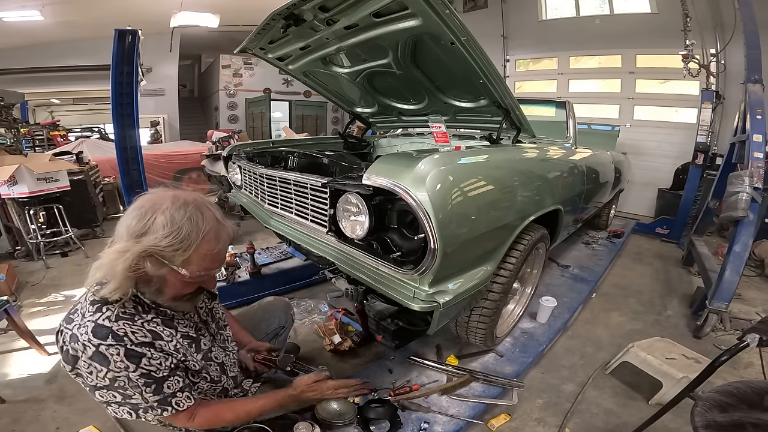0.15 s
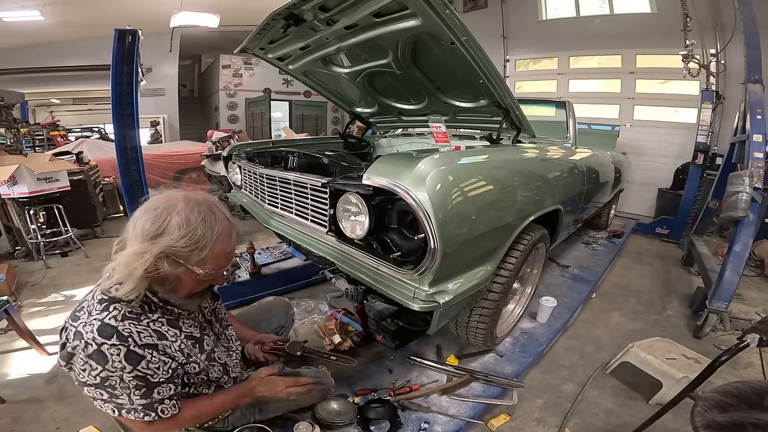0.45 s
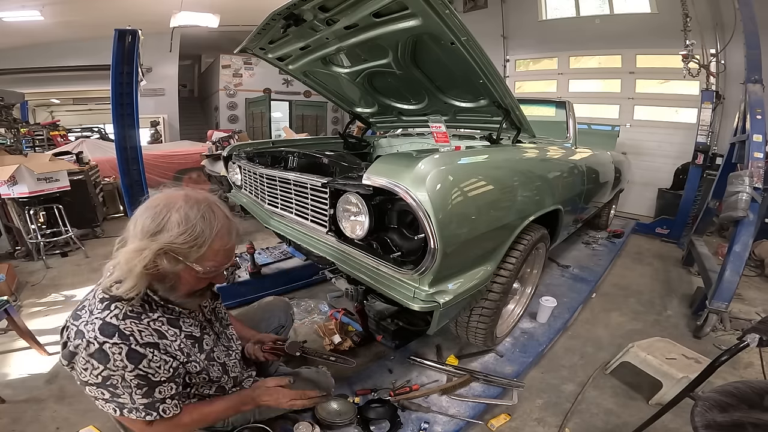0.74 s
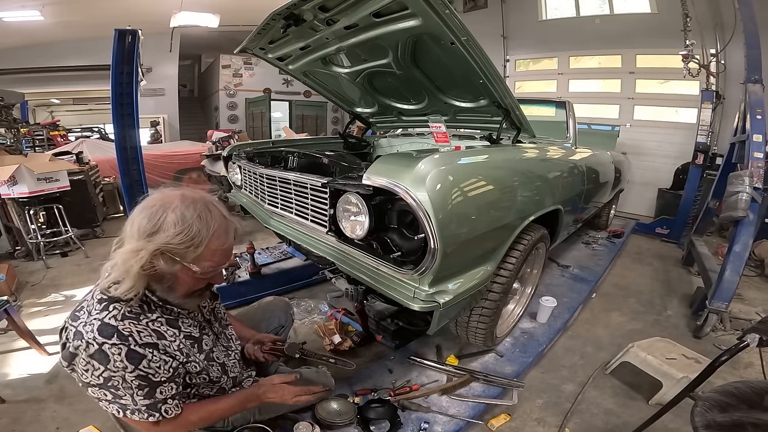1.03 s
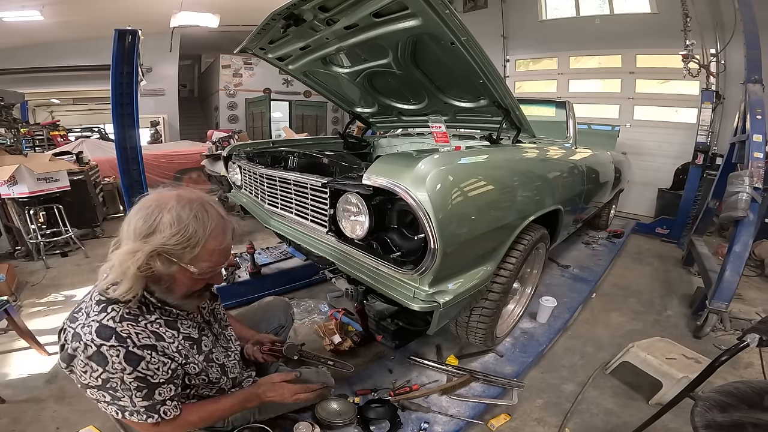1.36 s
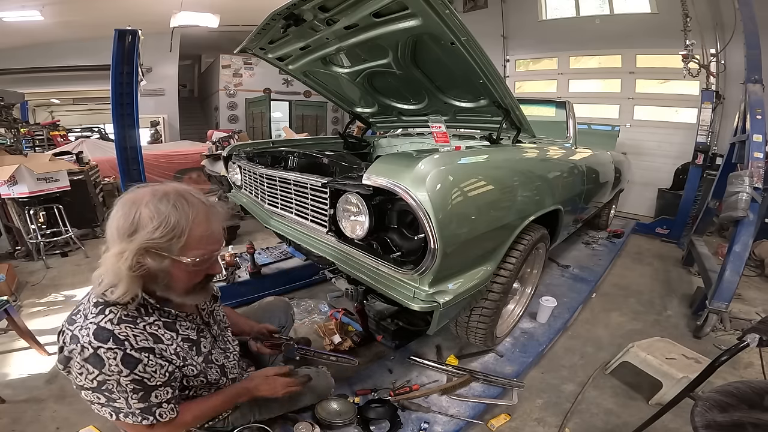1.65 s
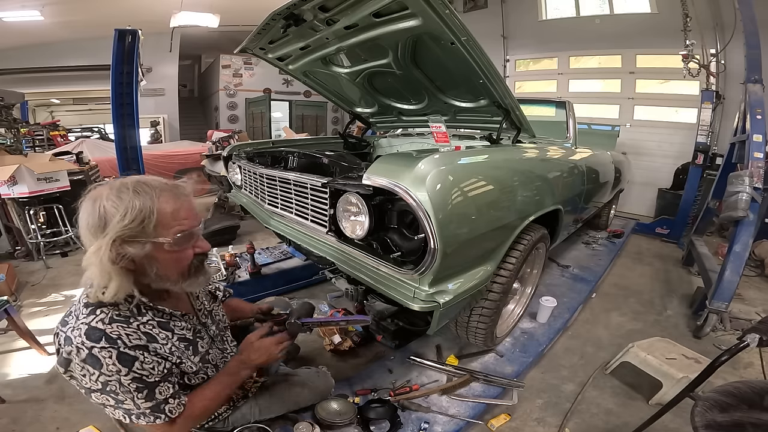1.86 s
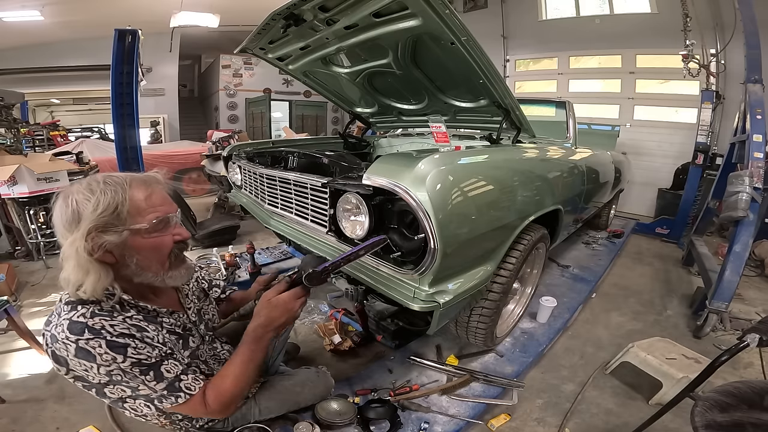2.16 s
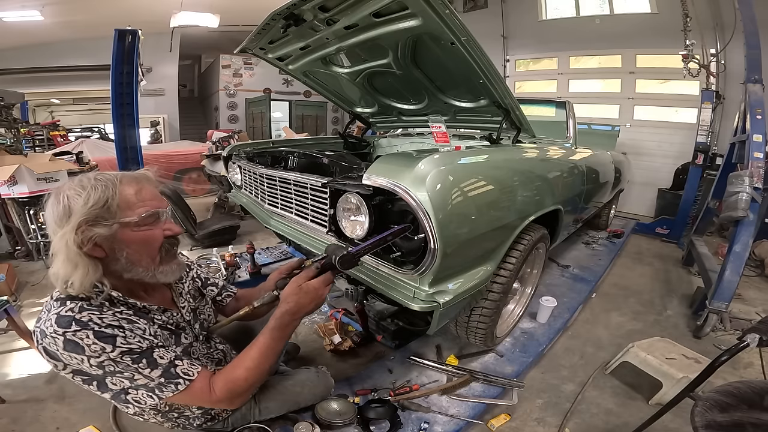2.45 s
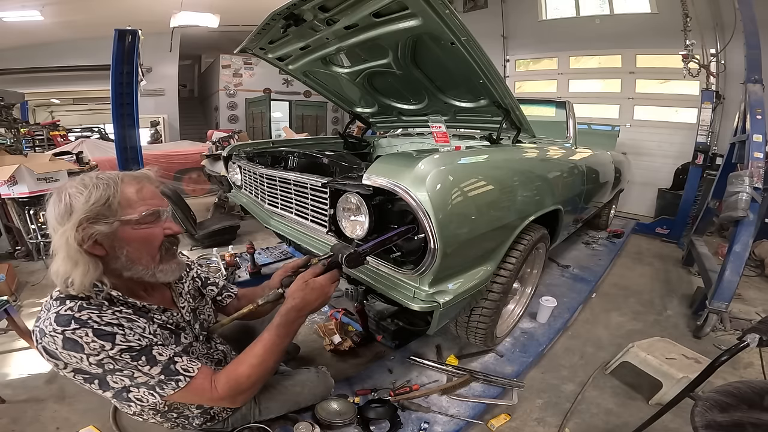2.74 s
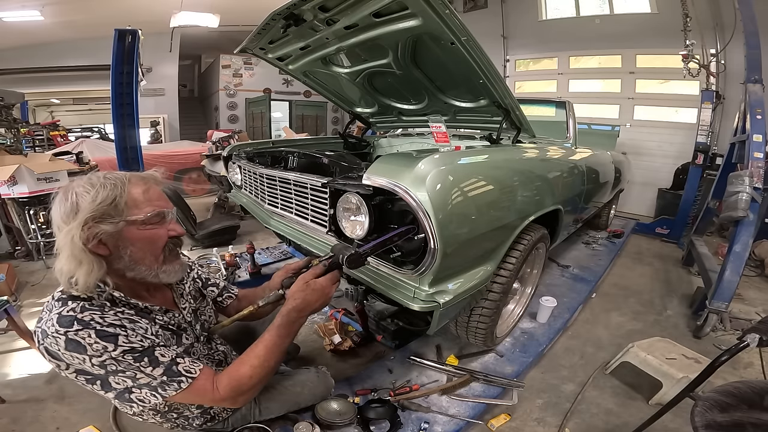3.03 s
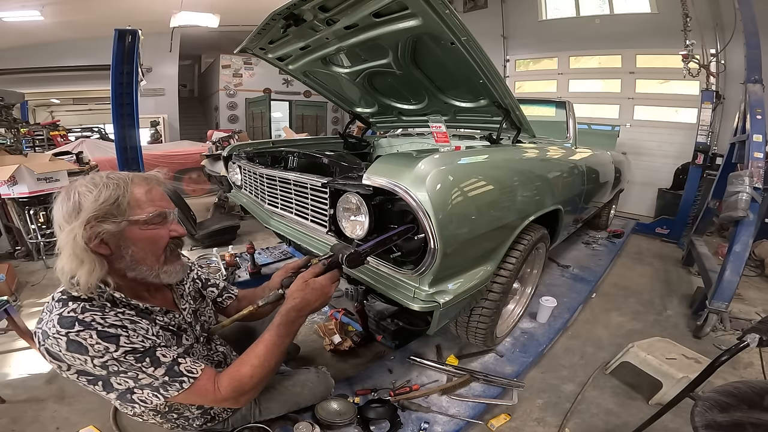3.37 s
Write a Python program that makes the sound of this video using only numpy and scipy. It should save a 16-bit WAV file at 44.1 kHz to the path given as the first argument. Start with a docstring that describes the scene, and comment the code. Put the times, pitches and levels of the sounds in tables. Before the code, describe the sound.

An air-driven rotary tool is blipped four times with snappy whines and hisses, pauses while a hollow part is knocked, then blips twice more and touches metal with a screech; close microphone in an echoing garage.

```python
"""An air-driven rotary tool is blipped in a large workshop: the trigger valve snaps open, air hisses and the vane
motor whines up and runs down. The vanes make a pulse train that rings the exhaust; the air is coloured noise.
The hall rings on as decaying noise. Between bursts a hollow part is knocked and scuffed by uneven noise grains;
at the end the bit taps metal (short sine modes) and screeches on it (noise through narrow resonances).
Mains hum, room noise, a faint air hiss and the dying tail of an earlier blast lie beneath."""
import sys
import numpy as np
from scipy import signal
from scipy.fft import rfft, irfft, next_fast_len
from scipy.io import wavfile
from scipy.ndimage import uniform_filter1d

SR = 44100
rng = np.random.default_rng(int(sys.argv[2]) if len(sys.argv) > 2 else 0)


def ratio_of_db(decibels):
    """Turn decibels (scalar or array-like) into linear amplitude factors; 0 dB maps to 1."""
    return 10 ** (np.asarray(decibels, float) / 20)


def wrap_up_sound(samples):
    """Save the sound to the file named by the first command line argument, as 16-bit audio."""
    columns = np.atleast_2d(samples).T
    # keep every value between -1 and 1, then stretch to whole-number steps
    tamed = np.clip(columns, -1, 1)
    steps = np.round(tamed * 32767).astype(np.int16)
    wavfile.write(sys.argv[1], SR, steps)


N = 154350
TIME = np.arange(N) / SR  # s
PATCHY_DB = 2.2  # usual unevenness of noise over time and frequency, dB rms


def unit(x):
    """Scaled to rms 1."""
    return x / np.sqrt(np.mean(x ** 2) + 1e-20)


def along(points, hz):
    """(Hz, value) points read on a log frequency axis."""
    f, v = np.transpose(points)
    return np.interp(np.log(hz + 1), np.log(f + 1), v)


def filtered(x, response):
    """x times a complex response of frequency."""
    size = next_fast_len(N + SR // 2)
    hz = np.fft.rfftfreq(size, 1 / SR)
    return irfft(rfft(x, size) * response(hz), size)[..., :N]


def noise(tone, patchy_db=PATCHY_DB):
    """Coloured noise of rms 1 with patches of random gain."""
    z = signal.stft(rng.standard_normal(N + 512), nperseg=512)[2]
    field = uniform_filter1d(rng.standard_normal(z.shape), 4, 0)
    field = uniform_filter1d(field, 8, 1)
    x = signal.istft(z * ratio_of_db(patchy_db * unit(field)), nperseg=512)[1][:N]
    return unit(filtered(x, lambda hz: ratio_of_db(along(tone, hz))))


def column(tables, index):
    """One column of several tables, interpolated along time."""
    rows = np.concatenate([np.array(r, float) for r in tables])
    return np.interp(TIME, rows[:, 0], rows[:, index])


def gain(tables, index=1):
    """Level column as gain, silent between the tables."""
    edge_s = 0.003
    on = sum(np.clip(np.minimum(TIME - r[0][0], r[-1][0] - TIME) / edge_s + .5, 0, 1) for r in tables)
    return np.minimum(on, 1) * ratio_of_db(column(tables, index))


def bursts_at(rows, t60):
    """An envelope that rises fast at each (s, dB) and dies away by 60 dB in t60 seconds."""
    rise_s = 0.0007
    total = np.zeros(N)
    for start, db in rows:
        age = np.abs(TIME - start)
        total += (TIME >= start) * ratio_of_db(db - 60 * age / t60) * (1 - np.exp(-age / rise_s))
    return total


def struck_mode(start, hz, db, t60):
    """One resonant mode rings as a decaying sine."""
    return bursts_at([(start, db)], t60) * np.sin(2 * np.pi * hz * (TIME - start))


def resonances(peaks, f):
    """The causal response of (Hz, width Hz, dB) resonances, summed with alternating sign."""
    total = 0
    for k, (centre, width, db) in enumerate(peaks):
        total = total + (-1) ** k * ratio_of_db(db) * 1j * f * width / (centre * centre - f * f + 1j * f * width)
    return total


def room_noise():
    """The empty room's steady, slightly patchy noise."""
    # Each row: frequency in Hz, spectrum in dB per Hz.
    floor_tone = [(18, -76), (40, -9), (109, 2.5), (160, -12.5), (186, -8), (328, -18.5), (2990, -23),
                  (7950, -49.5), (11400, -47.5), (14000, -53)]
    return ratio_of_db(-55.5) * noise(floor_tone)


def mains_hum():
    """Mains hum as steady sine tones."""
    # Each row: frequency in Hz, sine amplitude in dB.
    hum_tones = [(120, -64)]
    return sum(ratio_of_db(db) * np.sin(2 * np.pi * hz * TIME) for hz, db in hum_tones)


def air_leak():
    """A faint air hiss that sets in: coloured noise under a slow level curve."""
    # Level of the hiss. Each row: time in seconds, level in dB.
    leak_level = [(1.9, -75.5), (2.1, -66), (2.25, -57), (2.55, -60), (3.5, -60)]
    # Its colour. Each row: frequency in Hz, spectrum in dB per Hz.
    leak_tone = [(90, -33), (150, 0), (400, -11.5), (1360, -24), (2850, -25), (3060, -13), (3300, -27),
                 (3550, -27), (3720, -16.5), (3950, -22.5), (12300, -52), (14000, -66)]
    return gain([leak_level]) * noise(leak_tone)


def fading_blast():
    """An earlier blast of air dies in the hall, with one faint late puff, as fading noise."""
    # Level of the tail. Each row: time in seconds, level in dB.
    fading_level = [(0.0, -40.5), (0.27, -54), (.31, -48.5), (.36, -58), (0.5, -73)]
    # Its colour. Each row: frequency in Hz, spectrum in dB per Hz.
    fading_tone = [(88, -46), (150, -18), (280, 5.5), (467, -12), (532, -3), (2620, -1), (4220, -3),
                   (12000, -40), (15600, -90)]
    return gain([fading_level]) * noise(fading_tone)


def knocks():
    """Uneven soft contact drives the hollow part's resonances, with a scrape on top."""
    # One table a touch. Each row: time in seconds, ring level in dB, scrape over the ring in dB.
    touches = [
        [(2.585, -50.5, 2), (2.61, -46.5, -5.5), (2.685, -45, -40)],
        [(2.689, -34, -19), (2.72, -25.5, -28), (2.965, -46.5, -19.5)],
    ]
    # Resonances of the hollow part. Each row: centre in Hz, width in Hz, gain in dB.
    hollow = [(95, 30, -9), (174, 8.3, -1), (222.7, 7.7, 3.5), (302, 27, -9), (358, 24, -7), (431, 16, -12),
              (506, 32, -14), (580, 48, -16), (745, 180, -21.5)]
    # Colour of the scrape. Each row: frequency in Hz, spectrum in dB per Hz.
    scrape_tone = [(290, -42), (500, -12), (1760, -6), (2720, -16.5), (3030, -9), (7510, -34.5),
                   (9000, -59), (11700, -95)]
    roughness = unit(uniform_filter1d(rng.standard_normal(N), 300))
    grains = rng.standard_normal(N) * ratio_of_db(3.8 * roughness)
    ring = unit(filtered(grains, lambda f: resonances(hollow, f) / (1 + (f / 900) ** 2)))
    scrape = ratio_of_db(column(touches, index=2)) * noise(scrape_tone)
    return gain(touches) * (ring + scrape)


def clack():
    """One tap of the bit on metal rings a few short modes."""
    # Modes of the tapped metal. Each row: frequency in Hz, level in dB, t60 in seconds.
    clack_modes = [(1620, -21, .08), (2330, -23, .06), (2760, -27, .06)]
    return sum(struck_mode(3.362, hz, db, t60) for hz, db, t60 in clack_modes)


def screech():
    """Rubbing noise rings the sheet metal's narrow resonances."""
    # The bit rubbing metal. Each row: time in seconds, level in dB.
    rubbing = [(3.362, -33), (3.4, -44), (3.44, -52.5), (3.452, -32), (3.475, -28), (3.5, -27)]
    # Resonances of the sheet. Each row: centre in Hz, width in Hz, gain in dB.
    sheet = [(3870, 90, -7), (4760, 56, 1.5), (5100, 340, -10), (5310, 24, 5), (6830, 62, -8.5),
             (7590, 66, -8.5), (11100, 1300, -24.5)]
    return gain([rubbing]) * unit(filtered(rng.standard_normal(N), lambda f: resonances(sheet, f)))


def valve_ring():
    """The valve seat rings one mode as it opens from rest."""
    # Openings from rest. Each row: start in seconds, level in dB.
    openings = [(.617, -21.5), (2.968, -22.5)]
    return sum(struck_mode(start, hz=2005, db=db, t60=0.061) for start, db in openings)


def snaps():
    """Short cracks of air and metal from valve and rotor, each with a low push of pressure."""
    # Snaps. Each row: start in seconds, level in dB before the common trim, low push over it in dB.
    snap_rows = [(0.618, -21.5, -2.5), (0.639, -13, -1), (0.65, -10.5, -35), (0.999, -23.5, 0),
                 (1.024, -14.5, 2), (1.184, -17, -0.5), (1.199, -14.5, -4.5), (1.407, -16, 5),
                 (2.969, -12.5, -39), (2.991, -7.5, -6.5), (3, -8, -13), (3.016, -9, 2), (3.199, -14.5, -4),
                 (3.48, -19, -3)]
    # Colour of the crack. Each row: frequency in Hz, spectrum in dB per Hz.
    crack_tone = [(300, -39), (800, 2.5), (2000, 4.5), (4000, 2.5), (8000, -31), (14500, -73)]
    # Colour of the low push. Each row: frequency in Hz, spectrum in dB per Hz.
    thump_tone = [(30, -28), (90, -16), (160, 4), (350, 2), (700, -15), (1500, -50)]
    crack_hits = [(start, db) for start, db, _ in snap_rows]
    thump_hits = [(start, db + push_db) for start, db, push_db in snap_rows]
    crack = noise(crack_tone) * bursts_at(crack_hits, t60=0.025)
    thump = noise(thump_tone) * bursts_at(thump_hits, t60=0.15)
    return ratio_of_db(-8) * (crack + thump)


def vane_pulses(rate, turns, lowest_db):
    """Each passing vane lets out one pulse, slightly uneven in timing and size."""
    jitter, scatter_db = 0.008, 1.5  # rms, of a period; rms, of pulse size
    count = np.arange(1, int(turns[-1]))
    chance = rng.standard_normal((N // 40, 2))[:len(count)]
    at = np.interp(count + jitter * chance[:, 0], turns, np.arange(N))
    size = ratio_of_db(scatter_db * chance[:, 1])
    # a pulse between two samples is shared by both
    whole, part = at.astype(int), at % 1
    pulses = np.bincount(whole, size * (1 - part), N + 1)[:N]
    pulses = pulses + np.bincount(whole + 1, size * part, N + 1)[:N]
    # lift or lower the lowest partial
    pulses = pulses + (ratio_of_db(lowest_db) - 1) * 2 * rate / SR * np.cos(2 * np.pi * turns)
    return unit(pulses * np.sqrt(SR / rate))  # even power at every speed


def motor_whine(rate, turns, gate):
    """Vane pulses and puffs of noise ring the exhaust; the pitch follows the speed."""
    # Motor, strong under air, often swelling briefly after the release before a sharp drop, one table a burst.
    # Each row: time in seconds, level in dB before the motor trim, change of the lowest partial in dB.
    motor = [
        [(.636, -27.5, 4), (.667, -16, 0.5), (.706, -17, -1), (.735, -12, -13.5), (.75, -20, -12),
         (.765, -16.5, 4), (.787, -15, -15), (.792, -24, -3), (.83, -26.5, -3.5)],
        [(1.022, -27, 4.5), (1.05, -20.5, 2), (1.1, -19.5, -3), (1.125, -25, -1), (1.16, -30.5, -5)],
        [(1.203, -26.5, 5), (1.225, -20.5, 1), (1.312, -17.5, -1), (1.327, -16.5, -6), (1.333, -22, -0.5),
         (1.37, -32.5, -0.5)],
        [(1.408, -28.5, 5), (1.435, -20, 1), (1.518, -19, -2), (1.532, -15.5, -7.5), (1.538, -28, 1),
         (1.58, -30, 1)],
        [(3.0, -32, -5), (3.035, -18, 4), (3.1, -18.5, -12), (3.144, -15, -7), (3.149, -28.5, -2),
         (3.185, -38, 6)],
        [(3.195, -26, 2), (3.235, -19, 0.5), (3.275, -19, -3.5), (3.32, -15.5, -3), (3.355, -22, -7.5),
         (3.376, -15.5, -12), (3.381, -29.5, 3), (3.41, -30, -6)],
        [(3.478, -35, 16), (3.5, -35, 9)],
    ]
    # Resonances of the exhaust. Each row: centre in Hz, width in Hz, gain in dB.
    exhaust = [(263, 124, 9), (462, 296, 6), (677, 98, 6.5), (856, 64, 7.5), (938.5, 80, 9.5),
               (1104, 164, 3), (1650, 370, 0.5), (2090, 92, -8.5), (2410, 190, -10), (3430, 150, -16.5),
               (4260, 230, -16)]
    puffs = ratio_of_db(-27) * gate * rng.standard_normal(N)
    drive = vane_pulses(rate, turns, column(motor, index=2)) + puffs
    level = gain(motor)
    whine = filtered(-drive * level, lambda f: resonances(exhaust, f) / (1 + 1j * f / 5000) ** 3)
    whine *= np.linalg.norm(level) / np.linalg.norm(whine)  # overall energy set by the level curve
    return ratio_of_db(-2) * whine


def exhaust_hiss(gate):
    """Air rushes out as coloured noise, partly chopped by the turning vanes."""
    # Air flow through the exhaust, one table a pull of the trigger.
    # Each row: time in seconds, level in dB before the air trim.
    air = [
        [(0.617, -30.5), (0.719, -23), (0.9, -44)],
        [(0.998, -37.5), (1.042, -28), (1.18, -40.5)],
        [(1.182, -30), (1.322, -31.5), (1.388, -44)],
        [(1.39, -38), (1.452, -27), (1.66, -49)],
        [(2.967, -25), (3.137, -28), (3.188, -47)],
        [(3.19, -31.5), (3.308, -25), (3.435, -41)],
        [(3.44, -48), (3.46, -30.5), (3.5, -23)],
    ]
    # Colour of the air. Each row: frequency in Hz, spectrum in dB per Hz.
    hiss_tone = [(1120, -12), (1850, -6), (2050, 3), (2280, 0), (2520, 2), (2800, -5.5), (4120, -3),
                 (4520, -12.5), (5140, -12), (7660, -23.5), (9010, -32), (11900, -25), (14500, -41.5)]
    chopped = 0.08  # share of the air that follows the vanes
    hiss = noise(hiss_tone, patchy_db=3) * (1 - chopped + chopped * gate)
    return ratio_of_db(-1.5) * hiss * gain(air)


def tool():
    """One turning rotor times the vane pulses, the puffs and the chopping of the air."""
    # Run-up and run-down, one table a burst. Each row: time in seconds, vane pulse rate in Hz before smoothing.
    speed = [
        [(.636, 170), (.658, 290), (.68, 570), (.7, 750), (.716, 825), (.734, 860), (.752, 795), (.772, 620),
         (.789, 465), (.827, 240)],
        [(1.022, 150), (1.048, 300), (1.075, 434), (1.099, 512), (1.127, 320), (1.157, 200)],
        [(1.203, 165), (1.229, 338), (1.255, 466), (1.287, 540), (1.313, 574), (1.327, 465), (1.362, 260)],
        [(1.408, 165), (1.436, 337), (1.468, 480), (1.498, 538), (1.518, 568), (1.534, 460), (1.572, 250)],
        [(3.0, 120), (3.038, 374), (3.068, 495), (3.096, 537), (3.128, 566), (3.145, 430), (3.182, 230)],
        [(3.195, 150), (3.228, 330), (3.26, 490), (3.288, 610), (3.324, 693), (3.349, 661), (3.375, 450),
         (3.407, 215)],
        [(3.478, 130), (3.5, 230)],
    ]
    rate = uniform_filter1d(column(speed, index=1), size=SR // 220)
    turns = np.cumsum(rate) / SR  # vane passages so far
    gate = unit(np.exp(2.2 * np.cos(2 * np.pi * turns)))  # opens once a vane
    return motor_whine(rate, turns, gate) + exhaust_hiss(gate)


def echoes(x):
    """Near surfaces answer within a few milliseconds, duller than the direct sound."""
    # Floor and car body. Each row: delay in seconds, gain before the treble loss.
    surfaces = [(.0055, -0.099), (.0093, 0.094)]

    def response(f):
        delayed = sum(g * np.exp(-2j * np.pi * f * s) for s, g in surfaces)
        return delayed / (1 + 1j * f / 2500)

    return filtered(x, response)


def hall(x):
    """The hall answers with a noise tail in which each frequency dies at its own speed."""
    # Decay of the hall. Each row: frequency in Hz, t60 in seconds.
    hall_t60 = [(100, 0.67), (500, 1.11), (1500, 0.94), (4000, 0.98), (7000, 0.82), (11000, 0.74),
                (14000, 0.39)]
    delay_s = 0.008
    hz, t, z = signal.stft(rng.standard_normal(SR + SR // 2), SR, nperseg=256)
    decay = ratio_of_db(-60 * t / along(hall_t60, hz)[:, None])
    tail = signal.istft(z * decay, SR, nperseg=256)[1]
    late = np.pad(x, (round(delay_s * SR), 0))
    return ratio_of_db(-11.5) * signal.fftconvolve(late, tail / np.linalg.norm(tail))[:N]


def scene():
    """All sources reach one central microphone."""
    background = room_noise() + mains_hum() + air_leak() + fading_blast()
    near = knocks() + clack() + screech() + valve_ring() + snaps() + tool()
    mid = near + echoes(near) + hall(near) + background
    return np.array([mid, mid])


def colour(x):
    """Bass rolls off, a narrow treble notch is cut and the top falls steeply."""
    low_hz, top_hz = 101.7, 13600
    notch_hz, notch_width_hz, notch_depth = 9100, 170, 0.98

    def response(f):
        notch = 1 - notch_depth * np.exp(-((f - notch_hz) / notch_width_hz) ** 2)
        bass = (1j * f / (low_hz + 1j * f)) ** 2
        return notch * bass / (1 + (f / top_hz) ** 16)

    return filtered(x, response)


def side_hiss(mid):
    """A faint noise for the side channel: a steady part plus a part that follows the loudness."""
    # Colour of the side noise. Each row: frequency in Hz, spectrum in dB per Hz.
    side_tone = [(30, -15), (500, -15.5), (3000, -17), (8000, -22.5), (11000, -24), (14500, -12.5)]
    loud = np.sqrt(np.abs(uniform_filter1d(mid ** 2, 2048)))
    return (ratio_of_db(-90.5) + ratio_of_db(-42) * loud) * noise(side_tone + [(15000, -120)])


def right_lean(mid):
    """A quarter of the top treble, to be moved from left to right."""
    return 0.25 * filtered(mid, lambda f: 1 / (1 + (10800 / (f + 1)) ** 16))


def roll_off(x):
    """The treble ends steeply here."""
    return signal.sosfilt(signal.butter(12, 14970, fs=SR, output="sos"), x)


def record(dry):
    """The coloured sound gains a treble hiss of opposite sign left and right; its top leans right."""
    x = colour(dry)
    side = side_hiss(x[0]) - right_lean(x[0])
    mix = x + np.array([side, -side])
    return roll_off(mix)


dry = scene()
out = record(dry)
wrap_up_sound(out)
```